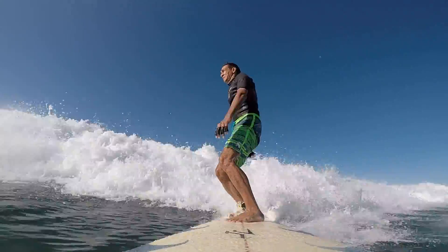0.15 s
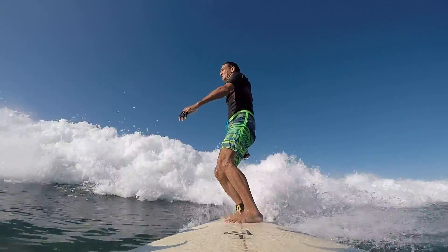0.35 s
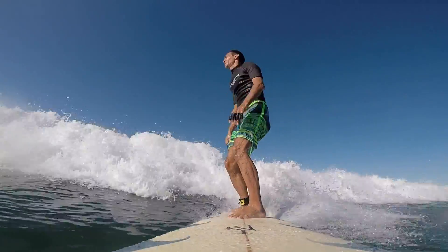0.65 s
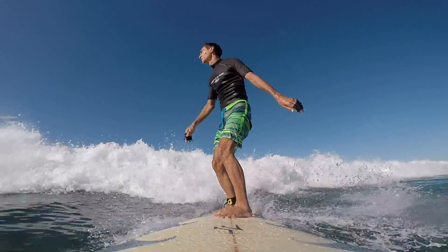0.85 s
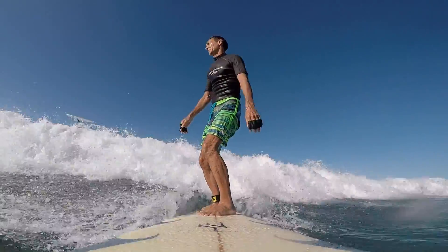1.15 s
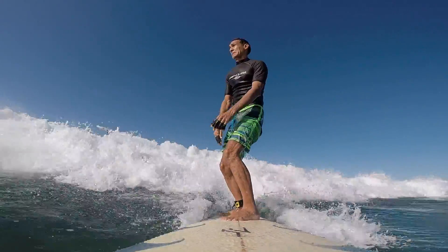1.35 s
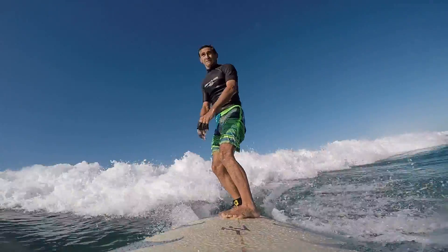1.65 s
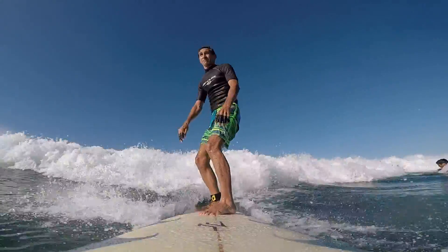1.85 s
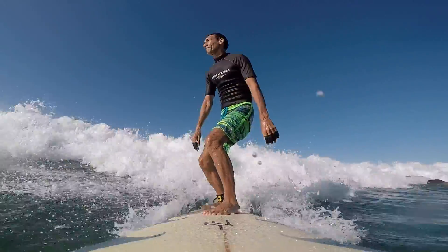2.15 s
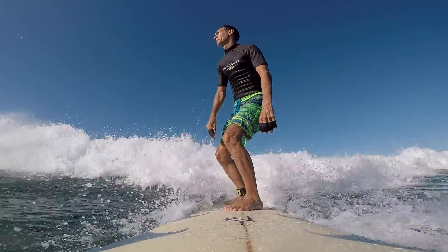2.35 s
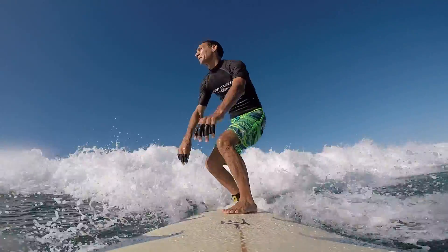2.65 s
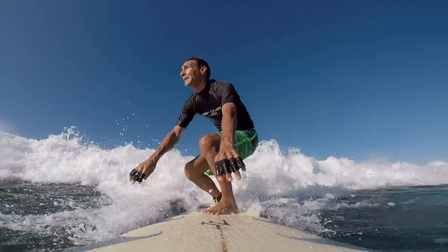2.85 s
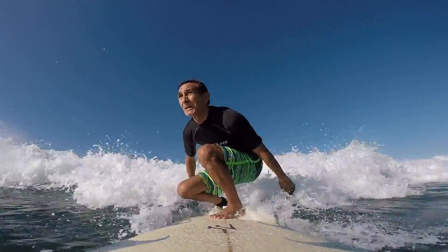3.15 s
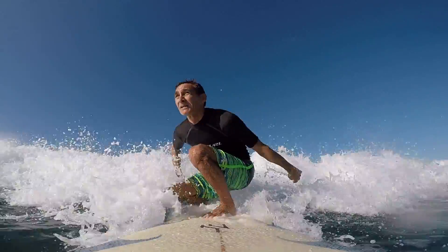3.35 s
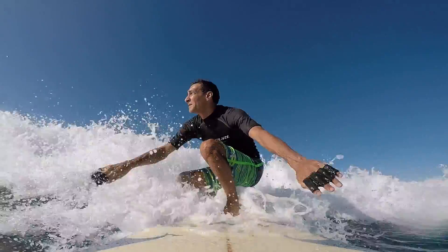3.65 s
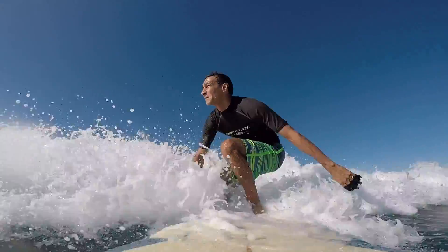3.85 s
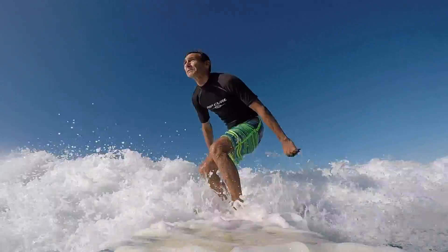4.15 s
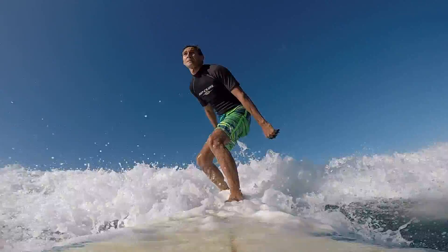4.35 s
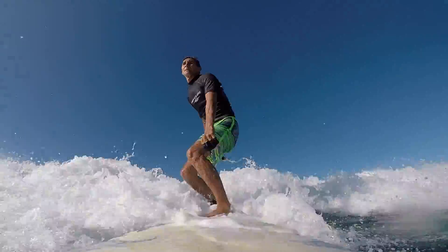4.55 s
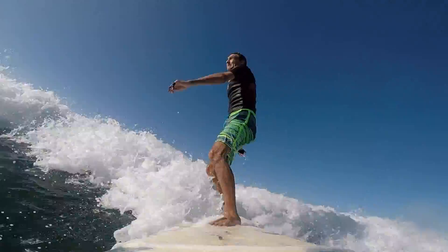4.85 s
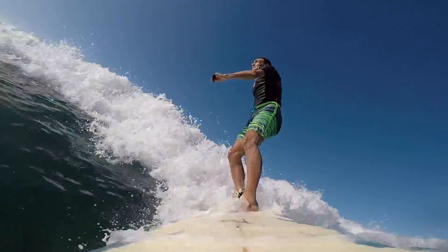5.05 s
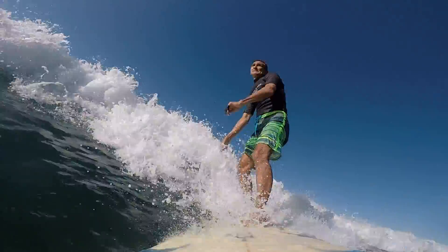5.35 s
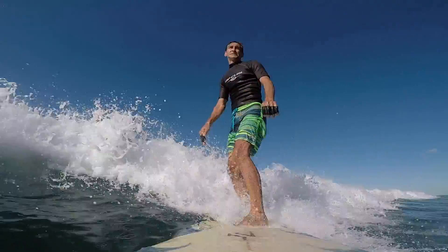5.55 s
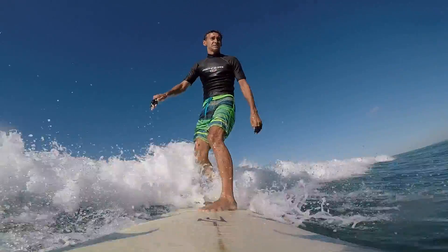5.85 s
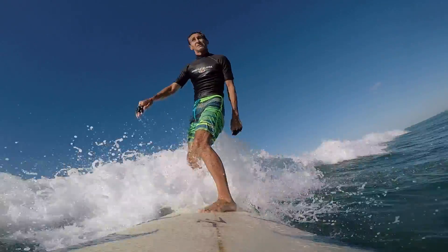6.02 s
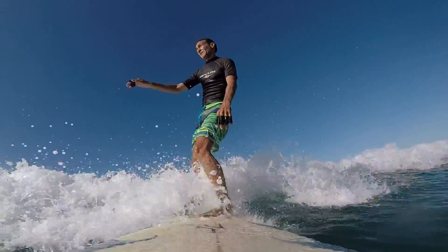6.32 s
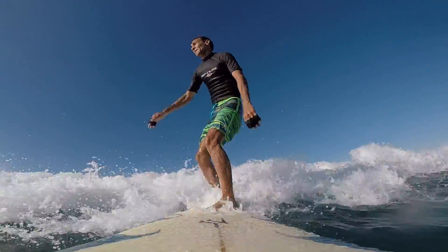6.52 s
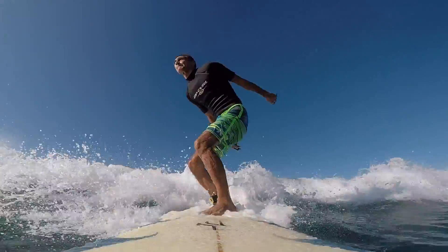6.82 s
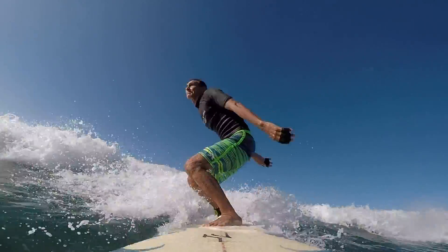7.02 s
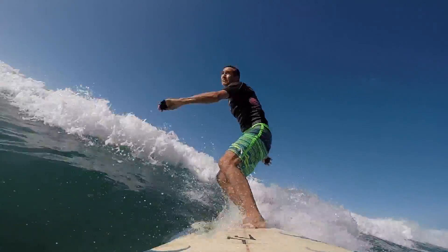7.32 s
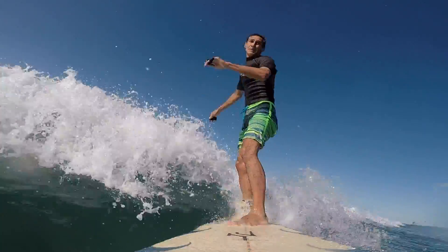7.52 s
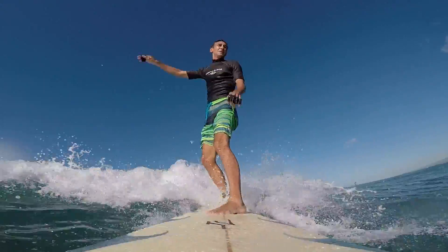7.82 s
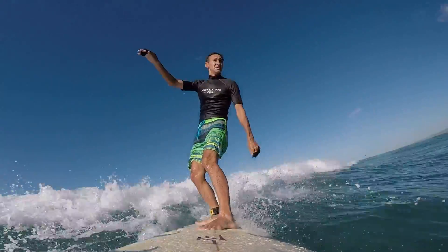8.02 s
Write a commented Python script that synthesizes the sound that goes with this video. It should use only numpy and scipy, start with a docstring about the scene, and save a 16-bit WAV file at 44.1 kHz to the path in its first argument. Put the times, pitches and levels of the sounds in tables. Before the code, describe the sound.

Gusty wind rumbles and flutters against a surfboard-mounted camera microphone while whitewater churns, foam hisses, and water slaps and cracks sharply on the case.

```python
"""A camera in a waterproof case rides the nose of a surfboard through whitewater.
From the start, coloured noise buffets its microphone as wind in gusts and lulls; broken water churns as lumpy
noise with damped bubble tones, foam hisses, and slaps of water land as decaying bursts of noise.
Near 2.0 s and again near 7.7 s a splash taps the case into ringing and leaves a film of water
that sizzles and dulls the finest fizz while it drains; after the second, wind and foam sink."""
import sys
import numpy as np
from scipy import signal
from scipy.fft import rfft, irfft, next_fast_len
from scipy.io import wavfile
from scipy.ndimage import uniform_filter1d, minimum_filter1d, map_coordinates

SR = 44100
rng = np.random.default_rng(int(sys.argv[2]) if len(sys.argv) > 2 else 0)


def dump_mix(stems):
    """Bounce the given channels to the path in sys.argv[1] as a 16-bit WAV at rate SR."""
    frames = np.atleast_2d(stems).T  # one column per channel
    limited = np.clip(frames, -1, 1)  # hard clip at full scale
    pcm = np.round(limited * 32767).astype(np.int16)
    wavfile.write(sys.argv[1], SR, pcm)


N = 360738

# water slapping the board and the case: [t/s, thump level/dB, slap level/dB, spatter level/dB, decay/s]
SLAPS = [(0.155, -15, -28, -50, 0.02), (0.288, -18, -25, -49, 0.03), (0.652, -28, -31, -50, 0.011),
         (0.807, -16, -29, -47, 0.016), (0.932, -13, -24, -51, 0.022), (1.333, -11, -30, -50, 0.016),
         (1.423, -14, -26, -52, 0.018), (1.799, -14, -28, -50, 0.0086), (1.834, -8, -28, -52, 0.038),
         (1.991, -6.5, -26, -29, 0.011), (2, -2, -24, -29, 0.0036), (2.138, -12, -28, -51, 0.011),
         (2.352, -6.5, -26, -47, 0.0091), (2.553, -17, -28, -45, 0.0038), (2.825, -11, -23, -42, 0.019),
         (4.002, -15.5, -28, -47, 0.028), (5.564, -8.5, -26, -46, 0.033), (5.829, -15.5, -28, -50, 0.032),
         (6.338, -17, -22, -49, 0.018), (6.442, -23, -24, -49, 0.011), (6.519, -24, -24, -47, 0.035),
         (6.678, -13, -26, -48, 0.017), (6.896, -23, -25.5, -45, 0.012), (7.095, -26, -27, -50, 0.012),
         (7.515, -14, -30, -44, 0.019), (7.673, -3, -17.5, -30, 0.016), (7.691, -4.5, -20, -21, 0.0036),
         (7.697, -5, -32, -40, 0.003), (7.853, -19.5, -27, -49, 0.022)]
# films of water left on the case by a splash:
# [t/s, nominal loss of fizz/dB, drain time/s, sizzle f/Hz, glide/(Hz/s), sizzle level/dB]
WATER_FILMS = [(2.05, 9.5, 0.58, 3700, -100, -55), (7.701, 7, 2.5, 4000, -2000, -53)]


def wind():
    """Turbulence: large eddies shake the microphone; small ones burst on their pressure peaks, most in gusts."""
    # strength of the head wind on the microphone, before the lulls: [t/s, level/dB]
    head_wind = [(0.0, -14), (0.42, -14.5), (0.62, -11), (1.08, -16), (1.38, -13), (1.85, -15.0),
                 (2.7, -14), (2.95, -15), (3.45, -14), (4.42, -12), (4.75, -11.5), (5.05, -14.5),
                 (5.4, -14.5), (5.9, -14), (6.2, -18.5), (6.7, -11.5), (7.68, -17), (7.76, -15),
                 (8.18, -30)]
    # vortices peeling off the case in step: [t/s, shedding f/Hz, bell width/s, glide/(Hz/s)]
    shedding = [(0.101, 71.5, 0.12, 60), (0.653, 116.7, 0.032, -150), (1.379, 84.6, 0.091, 150),
                (1.712, 114, 0.029, 99.5), (2.044, 47.73, 0.037, -78.5), (2.441, 87.5, 0.02, 401.5),
                (2.644, 51.3, 0.042, -59.5), (2.92, 72.3, 0.043, -80.5), (3.064, 32, 0.033, 1.5),
                (3.623, 71, 0.037, -80), (3.808, 38.2, 0.035, 50.5), (4.424, 122.4, 0.029, -60),
                (4.587, 56, 0.026, -250), (4.987, 93, 0.033, -400), (5.145, 66, 0.07, -22.5),
                (7.238, 117.8, 0.038, -300), (7.548, 69.65, 0.11, -61)]
    # turbulent gusts breaking on the case: [start t/s, length/s, flutter level/dB, drumming level/dB]
    gusts = [(0.0, 0.19, -23.5, -26), (0.233, .13, -17.5, -23), (0.417, 0.042, -40, -20),
             (0.767, 0.051, -17.5, -25), (0.891, 0.21, -19, -17.5), (1.122, 0.23, -18, -19),
             (1.397, 0.36, -24.5, -28.5), (1.794, 0.093, -17, -25), (1.965, 0.048, -23, -18),
             (2.11, 0.062, -24, -20), (2.408, 0.13, -27, -21), (2.782, 0.022, -19, -16),
             (2.964, 0.35, -31, -26.5), (3.793, 0.14, -22, -19), (4.485, 0.12, -25.5, -24.5),
             (4.99, 0.16, -29, -33), (5.53, 0.17, -22.5, -33), (5.84, 0.14, -19.5, -21),
             (6.048, 0.34, -29.5, -25), (6.314, 0.11, -19.5, -15.5), (6.497, 0.071, -15.5, -17),
             (6.656, 0.16, -17.5, -29), (6.873, 0.098, -20.5, -19.5), (7.062, 0.081, -22.5, -41),
             (7.51, 0.026, -25.5, -40), (7.65, 0.015, -18.5, -12)]
    # spectra of large, middling and small eddies: [f/Hz, relative density level/dB]
    rumble_spectrum = [(10, -18), (20, 2.5), (32, -4.5), (48, -1.5), (70, 1.5), (95, -2), (125, -2),
                       (155, -16.5), (200, -36), (600, -63), (1500, -120)]
    drum_spectrum = [(100, -29.5), (150, 1.5), (185, 0.5), (230, -4), (270, -8.5), (350, -21), (900, -79)]
    flutter_spectrum = [(120, -37), (230, -20.5), (300, 1.5), (400, 2), (500, -2), (720, -8.5), (860, -18),
                        (1080, -15), (1600, -30.5), (3000, -42.5), (8000, -100)]
    usual_db = -13.5  # usual strength of the wind
    buffet_db, unrest_db = 0.25, 1.27  # slow pressure relative to the wind, scale of its random swing
    drum_db, flutter_db = -26, -28  # middling and small eddies between gusts, at the usual strength
    drum_grows, flutter_grows = 0.46, 1  # dB of each per dB of wind
    in_step_share, in_step_lift_db = 0.57, 3.5  # power share in step, and how much harder it then swings
    in_step_calm_db = 6  # orderly shedding leaves fewer middling eddies
    shove_db, shove_s = -10, 0.013  # each slap shakes the case: level relative to its thump, length

    wind_db, = curves(head_wind)
    excess_db = wind_db - usual_db - lee_db()

    pressure = steady(noise(rumble_spectrum), span=0.13)
    orderly = np.zeros(N)
    for s, hz, length, glide in shedding:  # the random shaking gives way to a nearly regular flutter
        in_step = swell(s, length)
        share = np.clip(in_step_share * in_step, 0, 1)
        since = np.clip(np.arange(N) / SR - s, -2 * length, 2 * length)
        tone = wavering(hz + glide * since, drift=0.79, rate=20)
        pressure = np.sqrt(1 - share) * pressure + np.sqrt(share) * tone
        orderly = orderly + in_step

    swing_db = unrest_db * wobble(15) + in_step_lift_db * orderly
    buffet = amp(usual_db + excess_db + buffet_db + swing_db)
    shove = sum(amp(db + shove_db) * burst(s, shove_s, 0.0016, 0.0083) for s, db, *_ in SLAPS)

    drum_power = amp(drum_db + drum_grows * excess_db - in_step_calm_db * orderly) ** 2
    flutter_power = amp(flutter_db + flutter_grows * excess_db) ** 2
    for s, length, gust_flutter_db, gust_drum_db in gusts:
        gust = burst(s, length, attack=0.012, release=0.051)
        flutter_power = flutter_power + (amp(gust_flutter_db) * gust) ** 2
        drum_power = drum_power + (amp(gust_drum_db) * gust) ** 2

    drum = steady(noise(drum_spectrum) * amp(3.45 * wobble(35)), span=0.18)
    bursts = amp(0.9 * pressure + 1.87 * wobble(70))  # small eddies swell with the slow pressure
    flutter = steady(bursts * noise(flutter_spectrum), span=0.52)
    eddies = np.sqrt(drum_power) * drum + np.sqrt(flutter_power) * flutter
    return np.hypot(buffet, shove) * pressure + amp(1.4 * wobble(28)) * eddies


def lee_db():
    """Aerodynamic shelter: how far the lulls shield the microphone, in dB."""
    # the case slips briefly into the lee: [t/s, depth/dB, bell width/s]
    lulls = [(0.549, 23, 0.0065), (1.627, 4, 0.029), (1.928, 5, 0.012), (2.094, 6.5, 0.018),
             (2.263, 9.5, 0.039), (2.68, 3, 0.076), (3.688, 5, 0.016), (4.078, 2.5, 0.054), (4.7, 5, 0.13),
             (5.27, 7.5, 0.014), (5.465, 2.5, 0.053), (6.06, 3.5, 0.025), (6.858, 5, 0.025),
             (7.045, 3, 0.059), (7.737, 13, 0.027)]
    return sum(db * swell(s, length) for s, db, length in lulls)


def splashes():
    """Impact: a slug of water lands with a sudden thump and wet slap; its spatter decays with them."""
    # spectra of the blow, the wet slap and the spatter: [f/Hz, relative density level/dB]
    thump_spectrum = [(30, 11.5), (90, 9), (250, 1), (450, 1), (750, -8.5), (1150, -16.5), (1700, -24),
                      (2500, -49), (8000, -100)]
    slap_spectrum = [(200, -5), (600, 9), (1500, 2), (2500, -7.5), (3800, -18.5), (8000, -41), (13000, -90)]
    spatter_spectrum = [(300, -15), (1000, -6), (2000, -10), (3000, -4), (4050, 7), (4800, -5.5), (5550, 0),
                        (6500, -3), (8000, -18), (13000, -38), (15000, -71)]
    thump = steady(noise(thump_spectrum), span=0.0087)
    slap, spatter = noise(slap_spectrum), noise(spatter_spectrum)
    out, t = np.zeros(N), np.arange(SR // 4) / SR
    for s, thump_db, slap_db, spatter_db, decay in SLAPS:
        start = round(s * SR)
        part = slice(start, start + len(t))
        blow = (1 - np.exp(-t / 0.0016)) * np.exp(-t / decay)
        water = amp(thump_db) * thump[part] + amp(slap_db) * slap[part] + amp(spatter_db) * spatter[part]
        out[part] += blow * water
    return out


def drops():
    """Modal ringing: each drop cracks and excites the plastic case; the wall muffles the highest treble."""
    # single drops tapping the case: [t/s, peak level before muffling/dB, pitch factor, brightness/(dB/octave)]
    taps = [(2.0002, -1, 1.02, -3), (2.0055, -3, 0.946, 3), (2.015, -21, 1.02, 9), (2.0247, -9.5, 1.03, 2),
            (2.045, -14, 0.87, 1), (7.6915, -5.5, 1.11, 5.5)]
    # modes of the case, before each drop's pitch and brightness: [f/Hz, relative level/dB, t60/s]
    case_modes = [(1110, 14, 0.004), (1800, 5, 0.005), (3720, 1, 0.011), (4950, 2, 0.0051),
                  (5800, -16, .006), (8600, -16, 0.004)]
    crack_db, crack_t60_s = -19, 0.0054  # level on the scale of the modes, decay by 60 dB
    out, t = np.zeros(N + SR), np.arange(SR // 2) / SR
    pivot_hz = case_modes[2][0]  # brightness tilts about the third mode
    for s, db, pitch, tilt_db in taps:
        tap = amp(crack_db - 60 * t / crack_t60_s) * rng.standard_normal(len(t))
        for hz, level, t60 in case_modes:
            mode_db = level + tilt_db * np.log2(hz / pivot_hz) + rng.normal(0, 2.4)
            tap += amp(mode_db - 60 * t / t60) * np.sin(2 * np.pi * pitch * hz * t)
        out[round(s * SR):][:len(t)] += amp(db) * tap / np.abs(tap).max()
    wall = signal.butter(8, 9600, fs=SR, output="sos")
    return signal.sosfilt(wall, out[:N])


def whitewater():
    """Bubble resonance in turbulence: a lumpy rush with gurgling, and deeper sloshes where the rail digs in."""
    # broken water round the board, before trim and lee: [t/s, level/dB]
    wash = [(0.0, -32), (0.82, -33), (1.09, -31), (2.32, -32), (2.78, -33), (2.96, -28.5), (4.49, -31),
            (5.5, -29.5), (5.78, -32.5), (6.1, -28), (6.77, -31), (7.35, -31.5), (7.68, -31), (7.73, -40.5),
            (7.86, -28), (7.95, -40), (8.18, -38.5)]
    # the rail digs in and throws a surge of water: [t/s, level/dB, bell width/s]
    surges = [(0.106, -33.5, 0.16), (0.34, -32.5, 0.05), (0.574, -30, 0.09), (0.748, -29, 0.032),
              (1.17, -39, 0.17), (1.866, -29.5, 0.065), (2.5, -34, 0.037), (2.754, -26, 0.011),
              (2.82, -28, 0.025), (4.362, -28, 0.05), (4.459, -29, 0.011), (4.508, -29, 0.04),
              (5.17, -28.5, 0.026), (5.61, -29, 0.036), (5.868, -29, 0.014), (6.375, -38, 0.011),
              (6.545, -31, 0.036), (6.755, -32, 0.047), (7.14, -28.5, 0.021), (7.662, -24, 0.025),
              (7.86, -40, 0.019)]
    # spectra of the rush and of the surges: [f/Hz, relative density level/dB]
    churn_spectrum = [(150, -19), (400, -11.5), (700, 2), (850, 1), (1020, 2), (1300, 1.5), (1600, -1.5),
                      (2400, -6), (3100, -13), (4500, -15.5), (9000, -51)]
    slosh_spectrum = [(200, -23), (450, -4), (780, 7), (950, 3.5), (1250, 2.5), (1600, -5), (2400, -12),
                      (3200, -17), (4500, -28.5), (9000, -60)]
    trim_db, lumps_db = -1, 2  # rush relative to the wash level, scale of random swing within a surge
    lee_share = 0.32  # share of a lull that also shields the wash

    wash_db, = curves(wash)
    rush = unit(noise(churn_spectrum) * amp(1.12 * wobble(60)))
    gurgle = bubbles(count=5000, centre_hz=1410, spread=1.0, cycles=18, scatter_db=3.0, rise=0.088, size=800)
    gurgle = steady(coloured(gurgle, churn_spectrum), span=0.11)
    churn = amp(-3.0) * rush + amp(-6.0) * gurgle

    surge = sum(amp(db) * swell(s, length) for s, db, length in surges)
    slosh = steady(noise(slosh_spectrum) * amp(lumps_db * wobble(90)), span=0.28)
    return amp(wash_db + trim_db - lee_share * lee_db()) * churn + surge * slosh


def gurgles():
    """Volume resonance: trapped pockets of air and droplets ring unsteadily for a moment."""
    # air pockets and droplets beside the board: [t/s, f/Hz, level/dB, bell width/s]
    pockets = [(0.584, 1210, -25, 0.0049), (0.718, 1310, -23.5, 0.0064), (1.058, 998, -37, 0.11),
               (3.926, 6570, -31.5, 0.0033), (4.329, 1240, -28.5, 0.009), (4.98, 1217, -28.5, 0.0096),
               (5.18, 1184, -28, 0.01), (5.592, 1018, -29, 0.02), (6.335, 1724, -29, 0.007),
               (6.53, 1375, -24.5, 0.0068), (7.159, 1214, -26, 0.012), (7.235, 1217, -36, 0.04)]
    wavers = 1.6  # phase-drift knots within one bell width: the long rings sing more purely
    out = np.zeros(N)
    for s, hz, db, length in pockets:
        out += amp(db) * swell(s, length) * wavering(hz, drift=1.0, rate=wavers / length)
    return out


def foam():
    """Superposed bubble bursts: tiny bubbles hiss, and the finest part is dulled while the case is wet."""
    # spectra of the hiss and of its finest fizz: [f/Hz, relative density level/dB]
    hiss_spectrum = [(1200, -30), (2300, 0.5), (3300, -5), (3750, -1), (4100, -5), (4600, 0), (5300, -0.5),
                     (6200, 3.5), (6700, 0.5), (7300, -5), (8500, -23), (11000, -46)]
    fizz_spectrum = [(6000, -36), (7500, 2.5), (8500, 1), (10000, -5), (11200, -11.5), (12500, -18.5),
                     (15000, -33)]
    fizz_db, spread_s = -9.5, 0.15  # dry fizz on the scale of the hiss, time for a film to spread
    wet_db = sum(db * burst(s, spread_s, spread_s, drain) for s, db, drain, *_ in WATER_FILMS)
    pops = bubbles(count=9000, centre_hz=5230, spread=0.873, cycles=38, scatter_db=4.5, rise=0.04, size=250)
    hiss = amp(2.0) * noise(hiss_spectrum) + amp(-7.0) * coloured(pops, hiss_spectrum)
    fizz = noise(fizz_spectrum) * amp(fizz_db - wet_db + 0.69 * wobble(300))
    return amp(foam_level() + 0.93 * wobble(40)) * (hiss + fizz)


def foam_level():
    """Source density: level in dB of the foam bursting round the board, one value per sample."""
    # foam in the whitewater, then on leaving it, before the offset below: [t/s, level/dB]
    foam_passages = [
        [(0.0, -40.5), (0.55, -39), (1.45, -42.5), (1.97, -39), (2.18, -46.5), (2.7, -43.5), (3.15, -39.5),
         (3.88, -36.5), (4.15, -41), (4.57, -40), (4.71, -45), (5.0, -39.5), (5.6, -38), (5.79, -42),
         (5.87, -37.5), (6.55, -37.5), (7.05, -42.5), (7.69, -38.5)],
        [(7.71, -48), (7.78, -45), (7.815, -43), (7.875, -46), (7.92, -51.5), (8.18, -57)],
    ]
    hiss_db = -3.5  # offset of the hiss from the table
    return curves(np.vstack(foam_passages))[0] + hiss_db


def films():
    """Narrow-band noise: the wet microphone port sizzles in uneven spurts, sinking as the water runs off."""
    ring_s, width_hz, uneven_db = 0.16, 380, 5  # glide and release time, knots per second, swing scale
    out = np.zeros(N)
    for s, _, _, hz, glide, db in WATER_FILMS:
        pitch = hz + glide * np.clip(np.arange(N) / SR - s, 0, ring_s)
        phase = 2 * np.pi * np.cumsum(pitch) / SR
        band = unit(wobble(width_hz) * np.cos(phase) + wobble(width_hz) * np.sin(phase))
        out += amp(db) * burst(s, 0.06, 0.0061, ring_s) * band
    return amp(uneven_db * wobble(50)) * out


def bubbles(count, centre_hz, spread, cycles, scatter_db, rise, size):
    """Bubble resonance: randomly timed damped tones, each climbing in pitch as it nears the surface."""
    when, pitch, strength = rng.random((count, 3)).T
    hz = np.clip(centre_hz * np.exp(spread * (2 * pitch - 1)), 100, SR / 3)
    turns = hz[:, None] * np.arange(size) / SR
    age = turns / cycles  # 1 when the tone is 60 dB down
    ring = np.sin(2 * np.pi * turns * (1 + rise * age / 2)) * np.exp(-np.log(1000) * age)
    loud = amp(-scatter_db * np.log(np.maximum(strength, .004)))  # many small ones, a few large
    at = (when * N).astype(int)[:, None] + np.arange(size)
    return unit(np.bincount(at.ravel(), (loud[:, None] * ring).ravel(), N)[:N])


def wavering(hz, drift, rate):
    """Phase modulation: a tone of rms 1, at a fixed or moving pitch, whose phase drifts at random."""
    turns = np.cumsum(hz * np.ones(N)) / SR
    return np.sqrt(2) * np.sin(2 * np.pi * (turns + rng.random()) + drift * wobble(rate))


def swell(s, length):
    """Gaussian envelope: a smooth bell in time round second s, length being its standard deviation."""
    return np.exp(-.5 * np.minimum(((np.arange(N) / SR - s) / length) ** 2, 100))


def burst(s, length, attack, release):
    """Exponential envelope: rises from second s towards 1 and, after length, dies away."""
    t = np.arange(N) / SR - s
    return (1 - np.exp(-np.maximum(t, 0) / attack)) * np.exp(-np.clip((t - length) / release, 0, 40))


def wobble(rate):
    """Band-limited fluctuation: a smooth random curve, rate knots a second."""
    return map_coordinates(rng.standard_normal(int(N * rate / SR) + 4), [np.arange(N) * rate / SR])


def curves(rows):
    """Linear interpolation: one value per sample for each column after the time."""
    s, *cols = np.transpose(rows)
    return [np.interp(np.arange(N) / SR, s, c) for c in cols]


def noise(spectrum):
    """Spectral shaping of white noise: fresh coloured noise of rms 1."""
    return coloured(rng.standard_normal(N), spectrum)


def coloured(x, spectrum):
    """Spectral shaping: x filtered through (f/Hz, level/dB) points, at rms 1."""
    f, db = np.transpose(spectrum)
    return unit(filtered(x, lambda hz: amp(np.interp(np.log(hz + 1), np.log(f), db))))


def filtered(x, response):
    """Linear filtering: the spectrum of x times a response of frequency."""
    m = next_fast_len(N + 8192)
    return irfft(rfft(x, m) * response(np.fft.rfftfreq(m, 1 / SR)), m)[:N]


def steady(x, span):
    """Envelope normalisation: x at rms 1, its swells slower than span seconds evened out."""
    window = signal.windows.hann(int(span * SR) + 3)
    return unit(x / np.sqrt(np.abs(signal.fftconvolve(x ** 2, window, "same")) + 1e-9))


def unit(x):
    """Power normalisation: x at rms 1."""
    return x / np.sqrt(np.mean(x ** 2) + 1e-20)


def amp(db):
    """Logarithmic level: decibels to gain."""
    return 10 ** (np.asarray(db) / 20)


def scene():
    """Superposition: wind and water add at the one microphone."""
    water = splashes() + drops() + whitewater() + gurgles() + foam() + films()
    return (wind() + water)[None]


def record(dry):
    """Peak limiting and band limiting: the camera ducks the highest peaks and keeps nothing above 15.1 kHz."""
    needed = 1 / np.maximum(1, np.abs(dry[0]) / .97)
    gain = uniform_filter1d(minimum_filter1d(needed, size=181), size=181)  # ducks smoothly round each peak
    return filtered(dry[0] * gain, lambda hz: hz < 15100)[None]


dry = scene()
out = record(dry)
dump_mix(out)
```